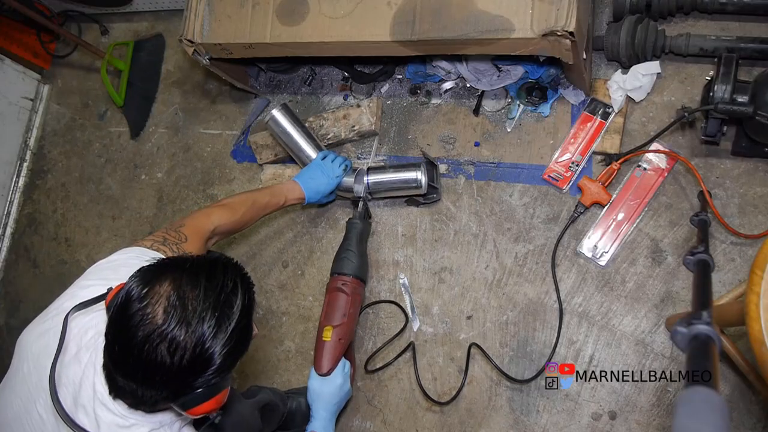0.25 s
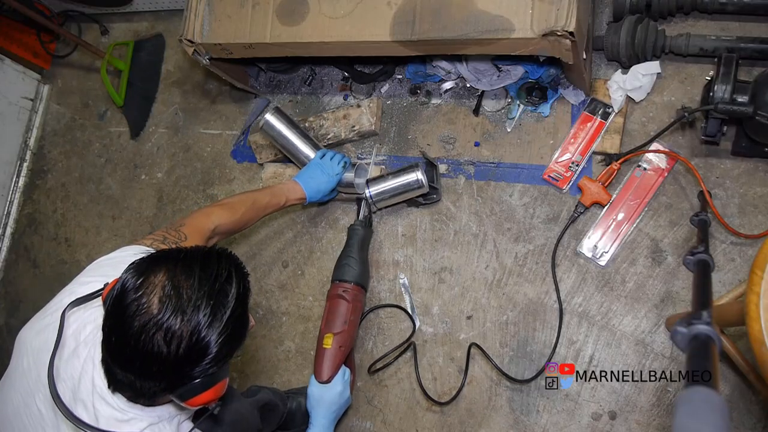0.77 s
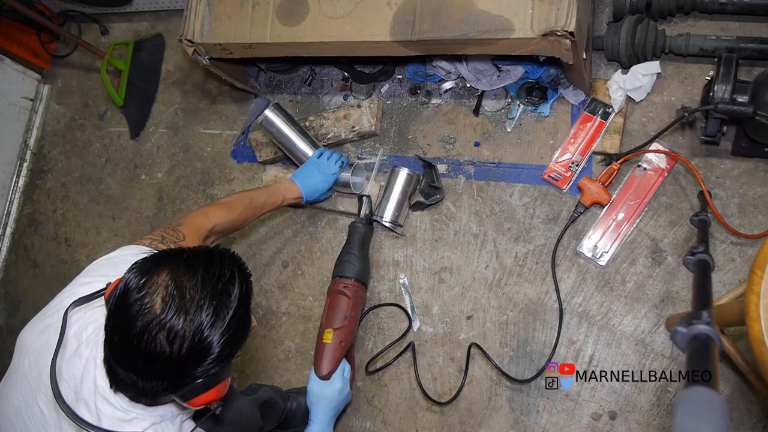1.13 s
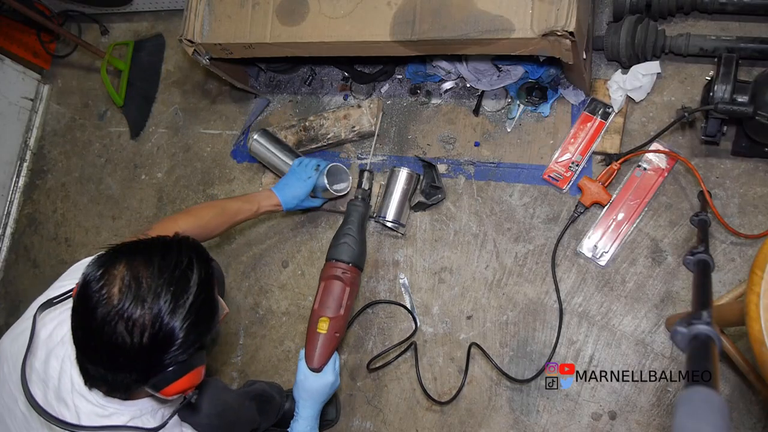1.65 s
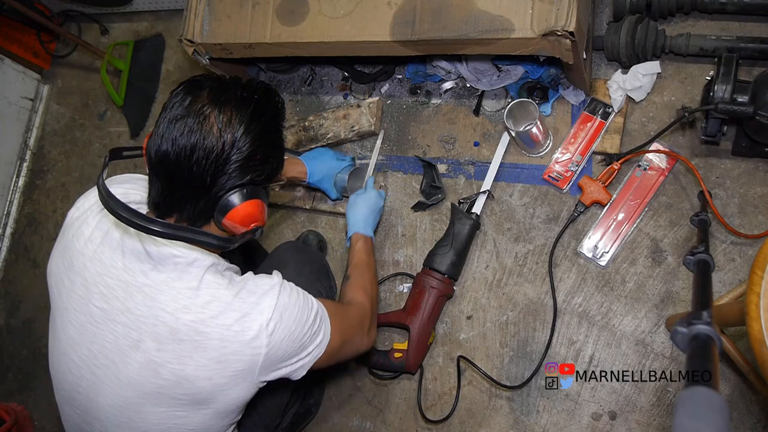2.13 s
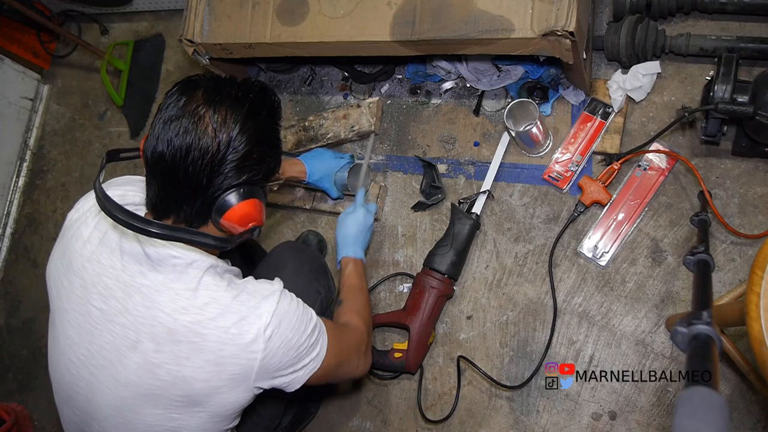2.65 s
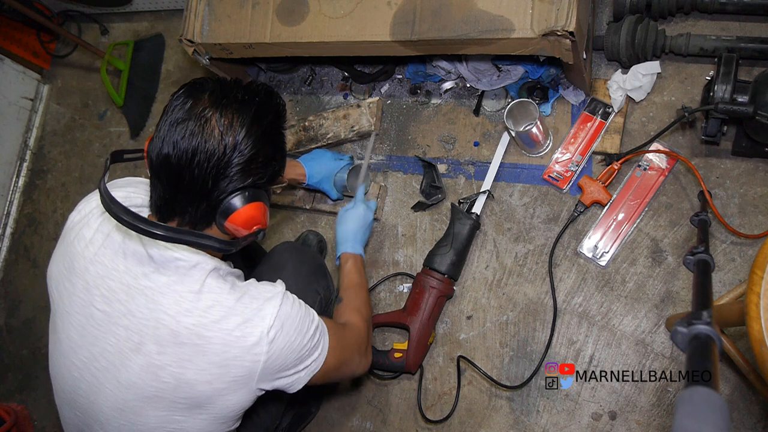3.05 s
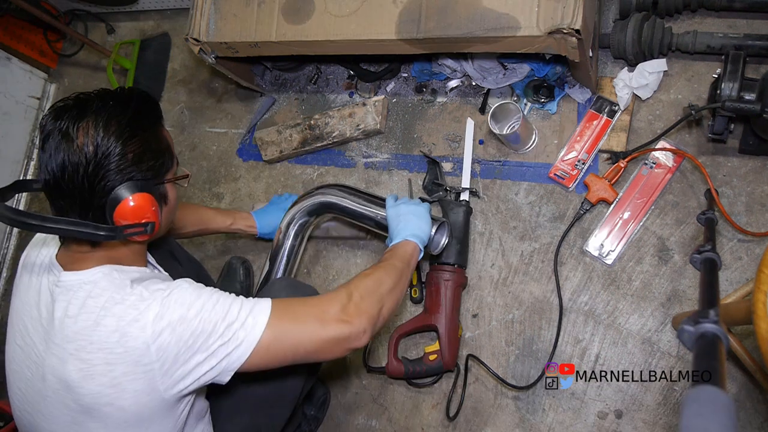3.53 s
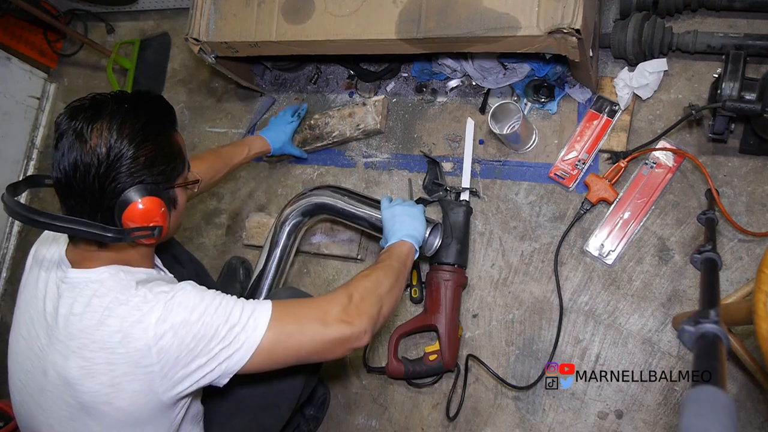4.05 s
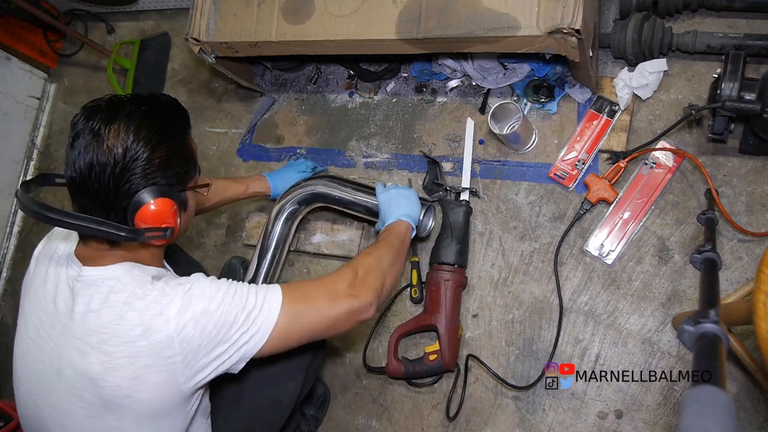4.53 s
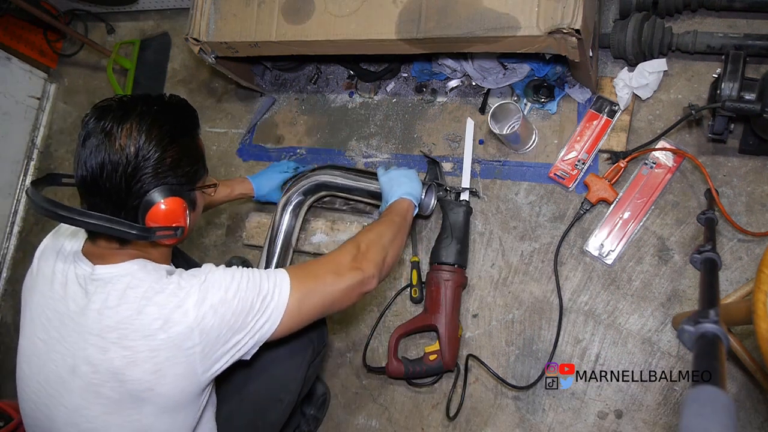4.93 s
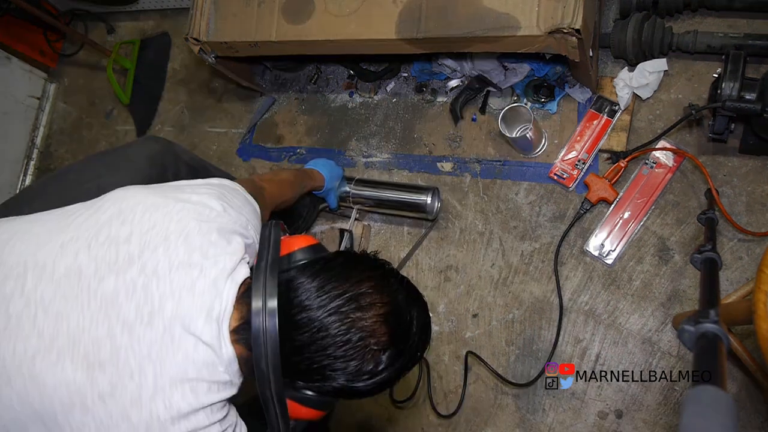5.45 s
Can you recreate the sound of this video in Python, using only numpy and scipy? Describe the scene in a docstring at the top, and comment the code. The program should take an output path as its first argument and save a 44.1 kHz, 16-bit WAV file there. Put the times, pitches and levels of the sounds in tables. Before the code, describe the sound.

A reciprocating saw rasps rapidly through thin aluminium pipe in a small garage. The offcut snaps loose with a bright ring and the saw runs on more quietly. After a hard cut, a hand file taps and strokes the rim four times over faint hum. Pipes and a wood block scrape and knock on concrete, then the saw bites again. Close, clear microphone, narrow stereo.

```python
"""A reciprocating saw rasps and chatters through a thin aluminium pipe, whose offcut snaps free; then it runs
on. Hard cuts lead to a hand file tapping and stroking the cut rim, then pipes and a wood block being shifted
about, then the saw biting again. Slipping contacts are uneven noise, bodies are banks of resonators driven by
it, and blade teeth are tones at set multiples of the tooth rate. A small hard garage answers over faint air
noise; mains hum underlies the filing and the start of the shifting."""
import sys
import numpy as np
from scipy import signal
from scipy.fft import rfft, irfft
from scipy.io import wavfile
from scipy.ndimage import uniform_filter1d

SR = 44100
rng = np.random.default_rng(int(sys.argv[2]) if len(sys.argv) > 2 else 0)


def ratio_of_db(decibels):
    """Turn decibels (scalar or array-like) into linear amplitude factors; 0 dB maps to 1."""
    return 10 ** (np.asarray(decibels, float) / 20)


def wav_record(signal):
    """Record a signal, one row per channel, as 16-bit PCM in the file named by sys.argv[1]."""
    frames = np.transpose(np.atleast_2d(signal))
    bounded = np.clip(frames, -1, 1)
    # unit amplitude maps onto the largest positive 16-bit level
    quanta = np.round(bounded * 32767).astype(np.int16)
    wavfile.write(sys.argv[1], SR, quanta)


N = 250488
TIME = np.arange(N) / SR


def noise():
    """White noise: equal mean power at every frequency."""
    return rng.standard_normal(N)


def unit(x):
    """Normalisation: scale to rms 1, so that a later gain sets the level."""
    return x / np.sqrt(np.mean(x ** 2))


def on_log(hz, table):
    """Logarithmic frequency scale: read a spectrum linearly in dB against log frequency."""
    table_hz, table_db = np.transpose(table)
    return np.interp(np.log(hz + 1), np.log(table_hz), table_db)


def colour(x, table):
    """Minimum-phase filtering: folding the cepstrum of the log gain makes the response causal."""
    size = 4096
    bins_hz = np.arange(size // 2 + 1) * SR / size
    cepstrum = irfft(np.log(ratio_of_db(on_log(bins_hz, table))), size)
    cepstrum[1:size // 2] *= 2
    cepstrum[size // 2 + 1:] = 0
    response = irfft(np.exp(rfft(cepstrum)), size)[:size // 2]
    filtered = signal.oaconvolve(np.atleast_2d(x), response[None], axes=1)
    return filtered[:, :x.shape[-1]].reshape(x.shape)


def columns(table):
    """Linear interpolation: each column of a timed curve, sample by sample."""
    s, *values = np.transpose(table)
    return [np.interp(TIME, s, v) for v in values]


def walk(rate):
    """Slow random modulation: levels drawn every 1 / rate s, smoothed by two moving averages."""
    k = int(SR / rate)
    held = np.repeat(rng.standard_normal(N // 40 + 1), k)[:N]
    return 1.49 * uniform_filter1d(uniform_filter1d(held, k), k)


def grit(spread_db):
    """Stick-slip friction: dense slips of very unequal size."""
    return unit(noise() * ratio_of_db(spread_db * rng.exponential(1, N).clip(0, 5)))


def ring(x, modes, sway_db=0., rate=10.):
    """Modal resonance: parallel damped modes; a wandering contact point feeds each unevenly."""
    out = 0
    for hz, width_hz, db in modes:
        r = np.exp(-np.pi * width_hz / SR)
        feed = x * ratio_of_db(sway_db * walk(rate)) if sway_db else x
        poles = [1, -2 * r * np.cos(2 * np.pi * hz / SR), r * r]
        out = out + ratio_of_db(db) * signal.lfilter([1 - r, 0, r - 1], poles, feed)
    return out


def split(modes, hz):
    """Division of a modal series: modes below and above a frequency."""
    return [m for m in modes if m[0] < hz], [m for m in modes if m[0] >= hz]


def strikes(times, peak_db):
    """Impulsive excitation: each hard contact is one sample."""
    out = np.zeros(N)
    out[(np.asarray(times) * SR).astype(int)] = ratio_of_db(peak_db)
    return out


def soften(x):
    """Finite contact time: metal on metal touches for a quarter of a millisecond, which dulls the click."""
    push = np.hanning(11)
    return np.convolve(x, push / push.sum())[:N]


def blows(times, peak_db, decay_s):
    """Exponential decay: noise bursts with a sudden start."""
    envelope = signal.lfilter([1], [1, -np.exp(-1 / (decay_s * SR))], strikes(times, peak_db))
    return envelope * noise()


def swell(s, length_s, start_db, end_db, rise_db_s, fall_db_s):
    """Gesture envelope: gains rise, hold on a slope and fall away in dB; the strongest one counts."""
    out = np.zeros(N)
    for t0, span, a, b in zip(s, length_s, start_db, end_db):
        hold = np.interp(TIME, [t0, t0 + span], [a, b])
        rise = rise_db_s * (t0 - TIME).clip(0)
        fall = fall_db_s * (TIME - t0 - span).clip(0)
        out = np.maximum(out, ratio_of_db(hold - rise - fall))
    return out


# mains hum partials: pitch_hz, mean level_db
HUM_PARTIALS = [(120, -66), (240, -77)]
# span of the hum: start_s, end_s
HUM_SPAN = [1.705, 3.66]


def hum():
    """Harmonic tone: mains hum is two steady sines whose levels waver a little."""
    partials = sum(ratio_of_db(db + 1.5 * walk(7.7)) * np.sin(2 * np.pi * hz * TIME) for hz, db in HUM_PARTIALS)
    return partials * ((TIME > HUM_SPAN[0]) & (TIME < HUM_SPAN[1]))


# spectrum of the still air: pitch_hz, relative level_db
AIR_SPECTRUM = [(15, -54.5), (25, -21.5), (214, -2), (245, -2.5), (281, -2), (398, -8.5), (431, -8),
                (480, -9.5), (822, -14), (891, -19.5), (966, -15), (1570, -28.5), (15400, -38.5)]
# stereo spread of air and room: pitch_hz, side-filter gain_db
SIDE_SPECTRUM = [(60, -20), (110, -13.5), (200, -24), (380, -16), (700, -13), (1290, -5), (2370, -6.5),
                 (4380, -7.5), (8080, -5.5), (14900, -2.5)]


def air():
    """Stationary broadband noise: low-heavy air with independent mid and side."""
    mid = unit(colour(noise(), AIR_SPECTRUM))
    side = colour(unit(colour(noise(), AIR_SPECTRUM)), SIDE_SPECTRUM)
    return np.array([mid, ratio_of_db(2) * side])


# reverberation bands: centre_hz, decay time t60_s, tail gain_db
ROOM_BANDS = [(254, 0.087, -6.5), (600, 0.19, -2), (2260, 0.33, -1.5), (4980, 0.32, -2.5),
              (10500, 0.041, -1.5)]


def garage():
    """Reverberation: direct sound, then a tail decaying band by band; nearby clutter scatters into the side."""
    t = np.arange(SR // 2) / SR
    tail = np.zeros((2, len(t)))
    for k, (hz, t60_s, db) in enumerate(ROOM_BANDS):
        passband = [(row[0], 0 if j == k else -30) for j, row in enumerate(ROOM_BANDS)]
        band = colour(rng.standard_normal((2, len(t))), passband)
        decay = np.exp(-np.log(1000) * t / t60_s)
        density = np.sqrt(2 * np.log(1000) / (t60_s * SR))  # evens out energy between decay times
        onset = np.minimum(t / 0.0079, 1)
        tail += ratio_of_db(db) * band * density * decay * onset
    clutter = rng.standard_normal(len(t)) * np.exp(-t / 0.0058) * ratio_of_db(-24.0)
    tail[0, 0] += 1  # direct sound
    return tail[0], colour(clutter + ratio_of_db(0.5) * tail[1], SIDE_SPECTRUM)


# gesture slopes of things dragged over concrete, dB per s
DRAG_RISE_DB_S, DRAG_FALL_DB_S = 4000, 312
# scraped concrete: pitch_hz, relative level_db
SCRAPE_SPECTRUM = [(530, -33), (900, -13), (1380, 5), (1480, 4), (1750, -3), (2750, 1), (2990, -0.5),
                   (9120, -3), (11000, -6.5), (15400, -18.5)]
# colour of a hard contact: pitch_hz, gain_db
CONTACT_COLOUR = [(88, -42.5), (150, -34), (945, -0.5), (1100, -9), (1360, -0.5), (2540, -16.5), (2850, -1),
                  (4040, -21.5), (4450, -16.5), (8430, -21.5), (9290, -35), (12200, -40.5), (15400, -53)]


def handled(drags, knocks, modes, low_gain_db, high_gain_db):
    """Friction and impact: a pipe scrapes and knocks on concrete; where it lands decides which modes ring."""
    s, length_s, scrape_db, start_db, end_db = np.transpose(drags)
    scrape_gain = swell(s, length_s, scrape_db, scrape_db, DRAG_RISE_DB_S, DRAG_FALL_DB_S)
    ring_gain = swell(s, length_s, start_db, end_db, DRAG_RISE_DB_S, DRAG_FALL_DB_S)
    scrape = scrape_gain * ratio_of_db(2.5 * walk(60)) * unit(colour(grit(3.), SCRAPE_SPECTRUM))
    dragged_ring = ring_gain * unit(ring(grit(6.), modes, sway_db=3., rate=15.))
    s, click_db, low_db, high_db = np.transpose(knocks)
    low, high = split(modes, 1700)
    low_ring = ring(soften(strikes(s, low_db + low_gain_db)), low)
    high_ring = ring(soften(strikes(s, high_db + high_gain_db)), high)
    clicks = ratio_of_db(-3.5) * colour(blows(s, click_db, 0.011), CONTACT_COLOUR)
    return scrape + dragged_ring + clicks + low_ring + high_ring


# drags of the first pipe: start_s, length_s, scrape level_db, ring level_db at start, ring level_db at end
PIPE_DRAGS = [(3.545, 0.034, -55.5, -53, -51), (3.618, 0.023, -60, -52, -53),
              (3.662, 0.06, -48.5, -41.5, -49), (3.76, 0.016, -58.5, -46.5, -49)]
# its knocks: start_s, then relative strengths click_db, low_ring_db, high_ring_db
PIPE_KNOCKS = [(3.5433, -55, -40.5, -63), (3.6184, -58, -43.5, -63), (3.6646, -48, -43.5, -45),
               (3.6928, -52, -39, -45), (3.7145, -58, -34, -37.5), (3.7526, -46, -36, -38.5),
               (3.7699, -32, -39, -51), (3.783, -42, -33, -46)]
# its modes: pitch_hz, width_hz, relative level_db
PIPE_MODES = [(1242, 15, 1), (1387, 40, -3), (2750, 30, -7), (3320, 80, -20), (4050, 120, -21),
              (5350, 110, -20), (5660, 92, -15.5), (6930, 190, -18.5), (7630, 180, -15.5)]
# slides of the wood block: start_s, length_s, level_db at start, level_db at end
BLOCK_SLIDES = [(4.129, 0.027, -56.5, -53.5), (4.196, 0.045, -53.5, -55.5)]
# rolls of the bent pipe: start_s, length_s, scrape level_db, ring level_db at start, ring level_db at end
BENT_ROLLS = [(4.742, 0.061, -71.5, -60, -58), (4.81, 0.12, -65.5, -56, -59.5),
              (4.948, 0.033, -65, -56, -60), (5.014, .02, -58, -52, -55), (5.056, .01, -64, -49, -52)]
# its knocks: start_s, then relative strengths click_db, low_ring_db, high_ring_db
BENT_KNOCKS = [(4.4794, -22, -30, -50), (4.551, -42, -60, -54), (4.5868, -26, -47, -45),
               (4.6963, -43, -64, -65), (4.7402, -39, -52.5, -55), (4.8303, -41, -51, -61),
               (4.851, -39, -75, -48), (4.892, -39, -56, -48), (4.9169, -47, -55, -46),
               (4.9465, -34, -64, -46), (4.9658, -46, -47.5, -56), (5.0134, -40, -67, -44.5),
               (5.0409, -48, -53, -45)]
# its modes: pitch_hz, width_hz, relative level_db
BENT_MODES = [(510, 60, -22), (1179, 19, 1.5), (1920, 90, -20), (2310, 90, -15), (2630, 80, -13),
              (2880, 45, 0), (3120, 80, -12), (4200, 100, -17), (5400, 110, -17)]


def shifting():
    """Sliding contact: a pipe is dragged, a block slides, the bent pipe is set down and rolled into place."""
    slide = swell(*np.transpose(BLOCK_SLIDES), DRAG_RISE_DB_S, DRAG_FALL_DB_S)
    block = slide * ratio_of_db(1.0 * walk(60)) * unit(colour(grit(3.7), SCRAPE_SPECTRUM))
    pipe = handled(PIPE_DRAGS, PIPE_KNOCKS, PIPE_MODES, 42.3, 51.0)
    bent_pipe = handled(BENT_ROLLS, BENT_KNOCKS, BENT_MODES, 52.7, 48.5)
    return pipe + block + bent_pipe


# file strokes: start_s, length_s, pressure level_db at start, at end, low ring level_db
FILE_STROKES = [(1.651, 0.035, -52, -45, -47), (2.003, 0.048, -28.5, -31.5, -41.5),
                (2.113, .015, -35, -38, -34), (2.438, .06, -32, -32.5, -35),
                (2.851, 0.057, -32.5, -28, -36.5), (3.263, 0.077, -31.5, -36, -36.5)]
# file landing on the rim: start_s, relative peak_db, thud_db above that peak
FILE_TAPS = [(1.906, -17, -22.5), (2.352, -17.5, -21), (2.763, -18.5, -18), (3.145, -19, -17)]
# modes of the filed pipe: pitch_hz, width_hz, relative level_db
RIM_MODES = [(523.5, 40, 0), (735, 11, 1.5), (977, 3.8, 8), (1316, 57, 7), (1557, 96, 5.5),
             (2130, 260, -12.5), (2727, 23.3, 11), (3351, 23, 6), (4330, 25, -17.5), (4500, 250, -11),
             (4590, 22, -3), (5380, 45, 1.5), (5590, 11, -33.5), (6560, 170, -47.5), (6560, 73, -3.5),
             (7200, 17, -6), (8280, 210, -7.5), (8900, 110, -41), (10460, 35, -34), (10710, 43, -42.5),
             (11500, 150, -23), (11000, 240, -25.5)]
# hiss of the file's teeth: pitch_hz, relative level_db
HISS_SPECTRUM = [(88, -57), (150, -33), (403, -8), (518, 1.5), (841, -11), (1590, 2), (2440, -23.5),
                 (2790, 2), (3880, -12.5), (5300, -11.5), (9290, -21.5), (11900, -41), (15400, -48)]
# colour of the early reflections: pitch_hz, gain_db
REFLECTION_COLOUR = [(500, -20.5), (1300, 17), (2000, -2), (3000, 8), (4700, -7.5), (7000, -9.5),
                     (12000, -23), (15400, -30)]


def filing():
    """Friction-driven modes: taps lead into pushes over the rim; the heel of a stroke rings the lowest modes."""
    rise_db_s, fall_db_s, heel_lead_s, heel_sag_db_s = 449.5, 322.5, 0.0075, 68
    low, high = split(RIM_MODES, 900)
    high_ring = unit(ring(grit(2.5), high, sway_db=2.5, rate=14.))
    low_ring = unit(ring(grit(2.), low, sway_db=2.5, rate=14.))
    hiss = unit(colour(grit(1.6), HISS_SPECTRUM))
    s, length_s, start_db, end_db, low_db = np.transpose(FILE_STROKES)
    push = swell(s, length_s, start_db, end_db, rise_db_s, fall_db_s)
    heel_end_db = low_db - heel_sag_db_s * length_s
    heel = swell(s - heel_lead_s, length_s + heel_lead_s, low_db, heel_end_db, rise_db_s, fall_db_s)
    rub = (push * (high_ring + ratio_of_db(-2.5) * hiss) + heel * low_ring) * ratio_of_db(1.7 * walk(70))

    s, peak_db, thud_db = np.transpose(FILE_TAPS)
    tap = ratio_of_db(7) * colour(blows(s, peak_db, 0.0046), CONTACT_COLOUR)
    struck_rim = ring(soften(strikes(s, peak_db + 30)), RIM_MODES)
    # early reflections prolong the tap as a short bright tail
    reflections = colour(blows(s, peak_db - 7, .018), REFLECTION_COLOUR)
    thud = ring(blows(s, peak_db + thud_db, 0.0055), [(350, 630, 16), (950, 140, 21)])
    return rub + tap + struck_rim + reflections + thud


# the offcut snapping free: start_s, relative peak_db
SNAP = [(1.186, -17)]
# modes of the end being cut off: pitch_hz, width_hz, relative level_db
LOOSE_MODES_THROUGH = [(940, 35, -5), (2890, 25, -4), (5150, 30, -4), (5467, 20, -1), (5756, 18, -1),
                       (6535, 22, -2), (6730, 25, -6), (8195, 25, -9)]


def offcut():
    """Impulse response: the last web of metal snaps and the loose piece rings."""
    s, peak_db = np.transpose(SNAP)
    snap = blows(s, peak_db, .007)
    return colour(snap, CONTACT_COLOUR) + ring(snap, LOOSE_MODES_THROUGH) * ratio_of_db(1)


# saw crank: time_s, strokes counted; a whole number falls on the middle of a cutting stroke
CRANK_TURNS = [(0, .2), (.137, 4), (.6845, 19), (.996, 28), (1.259, 36), (1.528, 48), (1.71, 55.4),
               (5.0455, 56), (5.6896, 82)]
# the blade binds and the loose end rings up: start_s, length_s, level_db
BLADE_BINDS = [(0.18, 0.012, -45), (0.58, .02, -38.5), (0.67, 0.027, -39), (0.88, 0.078, -39),
               (1.198, 0.062, -33.5), (1.27, 0.083, -39.5), (1.454, 0.012, -42.5), (5.06, 0.027, -44)]
# a whistle near 4 kHz swells: start_s, length_s, level_db
WHISTLE_SWELLS = [(1.18, 0.024, -47), (1.4, 0.15, -43.5), (5.222, 0.13, -47)]
# motor noise: pitch_hz, relative level_db
MOTOR_SPECTRUM = [(59, -79), (100, -27), (140, -36), (563, 1.5), (822, -10.5), (1150, 4), (2080, -3.5),
                  (4080, -3), (9270, -18), (11400, -24.5), (15400, -35.5)]


def saw(feed, cut, rasp, held, loose, whistle_modes, chatter, bite_share, throb_db, glide, rough):
    """Periodic excitation: teeth rasp and ring the pipe, and chatter at the tooth rate when the blade is fast."""
    rasp_db, chatter_db = columns(feed)
    tooth_hz, motor_db, held_db, loose_db, whistle_db = cut
    bind_rise_db_s, bind_fall_db_s = 396, 150
    s, length_s, bind_db = np.transpose(BLADE_BINDS)
    loose_gain = ratio_of_db(loose_db) + swell(s, length_s, bind_db, bind_db, bind_rise_db_s, bind_fall_db_s)
    s, length_s, swell_db = np.transpose(WHISTLE_SWELLS)
    whistle_swell = swell(s, length_s, swell_db, swell_db, bind_fall_db_s, bind_fall_db_s)
    whistle_gain = ratio_of_db(whistle_db + 4.2 * walk(12)) + whistle_swell
    # the hand wavers
    held_gain = ratio_of_db(rasp_db + held_db + 2.6 * walk(15))
    motor_gain = ratio_of_db(motor_db + 1.0 * walk(15))

    # place in the stroke, -0.5 to 0.5, with mid-cut at 0; bite_share is a fraction of a stroke
    turn = (np.interp(TIME, *np.transpose(CRANK_TURNS)) + .5) % 1 - .5
    bite = np.exp(-.5 * (turn / bite_share) ** 2)
    # the teeth drag lightly on the return
    back = ratio_of_db(-17) * np.exp(-.5 * ((np.abs(turn) - .5) / bite_share) ** 2)
    slips = grit(1.8) * ratio_of_db(throb_db * bite)

    # the blade still gathers speed during the bite, and the teeth slip unevenly
    tooth_rate = tooth_hz * (1 + glide * turn + rough * walk(300))
    phase = 2 * np.pi * np.cumsum(tooth_rate) / SR
    harmonics = sum(ratio_of_db(db + 2.2 * walk(200)) * np.sin(k * phase) for k, db in chatter)
    teeth = unit(harmonics * (bite + back) * ratio_of_db(1.2 * walk(40)))

    scratch = unit(colour(slips, rasp) * ratio_of_db(1.6 * walk(60)))
    motor = motor_gain * unit(colour(noise(), MOTOR_SPECTRUM))
    whistle = whistle_gain * unit(ring(noise(), whistle_modes))
    held_ring = held_gain * unit(ring(slips, held, sway_db=2.5, rate=12.))
    loose_ring = loose_gain * unit(ring(slips, loose, sway_db=4.5, rate=12.))
    return ratio_of_db(rasp_db) * scratch + motor + whistle + ratio_of_db(chatter_db) * teeth + held_ring + loose_ring


# first cut, feed on the blade: time_s, rasp level_db, tooth chatter level_db
FEED_THROUGH = [(0, -33.5, -47), (.2, -34.5, -40), (.25, -38, -52), (.34, -36.5, -34), (.52, -34.5, -42),
                (.59, -36.5, -53), (.65, -35.5, -42.5), (.72, -35.5, -57.5), (.95, -35, -64),
                (1.15, -36.5, -63), (1.192, -33.5, -50), (1.215, -43.5, -59), (1.28, -49, -59),
                (1.42, -44.5, -54.5), (1.705, -41.5, -48.5)]
# its levels: tooth rate_hz, motor_db, held ring_db above the rasp, loose ring_db, whistle_db
LEVELS_THROUGH = (1080, -40, -8.5, -60.5, -53.5)
# its rasp: pitch_hz, relative level_db
RASP_SPECTRUM_THROUGH = [(35, -86), (60, -45), (145, -19), (375, -12.5), (473, 0), (686, -2.5), (1090, -1),
                         (2350, -12), (2700, -4), (3910, -8.5), (5290, -7), (12200, -20), (15400, -31.5)]
# modes of the held part: pitch_hz, width_hz, relative level_db
HELD_MODES_THROUGH = [(500, 90, -6), (1640, 100, -4), (2700, 35, -3), (2970, 35, -4), (3490, 100, -9),
                      (4965, 30, -3), (5153, 35, -2), (6470, 35, -6), (7600, 60, -13), (8195, 25, -8),
                      (8730, 25, -13), (9600, 150, -15), (11200, 100, -18)]
# its whistle: pitch_hz, width_hz, relative level_db
WHISTLE_MODES_THROUGH = [(3840, 70, -14), (4192, 12, 0)]
# its chatter: multiple of the tooth rate, relative level_db
HARMONICS_THROUGH = [(1, 4.5), (1.5, -3.5)]


def saw_through():
    """Forced vibration: the saw cuts through the thin pipe and runs free."""
    return saw(FEED_THROUGH, LEVELS_THROUGH, RASP_SPECTRUM_THROUGH, HELD_MODES_THROUGH, LOOSE_MODES_THROUGH,
               WHISTLE_MODES_THROUGH, HARMONICS_THROUGH, bite_share=.19, throb_db=3.5, glide=.06, rough=.025)


# second cut, feed on the blade: time_s, rasp level_db, tooth chatter level_db
FEED_AGAIN = [(5.066, -38, -32.5), (5.14, -38.5, -40), (5.33, -36.5, -32.5), (5.385, -42.5, -41.5),
              (5.49, -41, -34.5), (5.6, -35.5, -33), (5.68, -44.5, -43.5)]
# its levels: tooth rate_hz, motor_db, held ring_db above the rasp, loose ring_db, whistle_db
LEVELS_AGAIN = (1277, -39.5, -3.5, -44.5, -55.5)
# its rasp: pitch_hz, relative level_db
RASP_SPECTRUM_AGAIN = [(60, -80), (230, -36), (330, -22), (560, -9.5), (1000, -1.5), (1800, -21.5),
                       (2600, 0.5), (4000, -11), (7300, -11), (12000, -20.5), (15400, -38)]
# modes of the held part: pitch_hz, width_hz, relative level_db
HELD_MODES_AGAIN = [(312, 30, -10), (560, 45, -4), (955, 65, 0), (1110, 60, -7), (2410, 40, -8)]
# modes of the end being cut off: pitch_hz, width_hz, relative level_db
LOOSE_MODES_AGAIN = [(3428, 67, 9), (4320, 40, 5.5), (4760, 63, -7), (6240, 110, -1), (6580, 220, -4),
                     (7320, 40, 7), (8300, 29, -12), (10800, 99, -5), (11700, 61, -27)]
# its whistle: pitch_hz, width_hz, relative level_db
WHISTLE_MODES_AGAIN = [(3935, 40, 0)]
# its chatter: multiple of the tooth rate, relative level_db
HARMONICS_AGAIN = [(1, 2.5), (2, -6), (3, -14)]


def saw_again():
    """Forced vibration: the saw bites again, with a sharper throb and a faster tooth rate."""
    return saw(FEED_AGAIN, LEVELS_AGAIN, RASP_SPECTRUM_AGAIN, HELD_MODES_AGAIN, LOOSE_MODES_AGAIN,
               WHISTLE_MODES_AGAIN, HARMONICS_AGAIN, bite_share=.13, throb_db=5., glide=.12, rough=.015)


# boundaries of the four passages: time_s
PASSAGE_EDGES = [0, 1.705, 3.545, 5.064, 5.7]
# air noise in each passage: level_db
AIR_LEVELS = [-70.5, -61, -60.5, -85]


def scene():
    """Linear superposition: each passage is convolved with the room and cut hard against the next."""
    passages = [saw_through() + offcut(), filing(), shifting(), saw_again()]
    response, floor = np.array(garage()), air()
    mid_side = 0
    for k, passage in enumerate(passages):
        in_room = signal.fftconvolve(passage[None], response, axes=1)[:, :N]
        heard = in_room + ratio_of_db(AIR_LEVELS[k]) * floor
        mid_side = mid_side + heard * ((TIME >= PASSAGE_EDGES[k]) & (TIME < PASSAGE_EDGES[k + 1]))
    mid, side = mid_side
    left_right = np.array([mid + side, mid - side] + hum())
    return left_right * ratio_of_db(np.array([[-.4], [.4]]))  # leans slightly right


def low_pass(x):
    """Removes everything above the highest recorded frequency."""
    return signal.sosfilt(signal.butter(12, 15520, fs=SR, output="sos"), x)


def record(dry):
    """Linear filtering: the microphone has a narrow dip near 9 kHz and the top is cut above 15.3 kHz."""
    dipped = signal.lfilter(*signal.iirnotch(9100, 14, SR), dry)
    lowpass = signal.ellip(8, .2, 70, 15300, fs=SR, output="sos")
    finished = signal.sosfilt(lowpass, dipped)
    return low_pass(finished)


dry = scene()
out = record(dry)
wav_record(out)
```